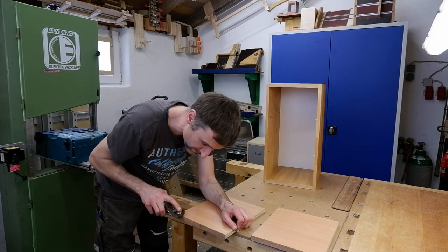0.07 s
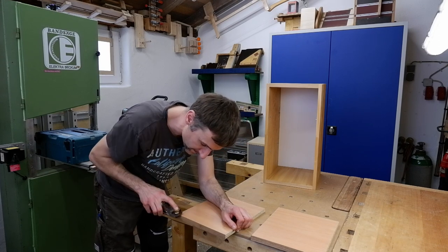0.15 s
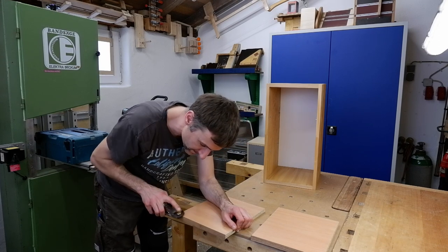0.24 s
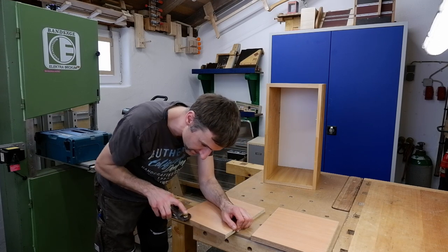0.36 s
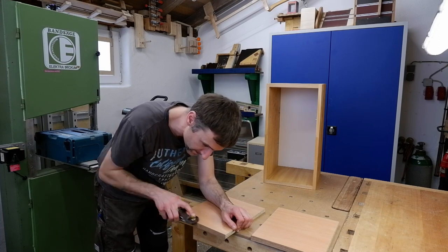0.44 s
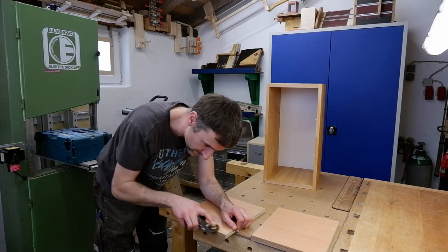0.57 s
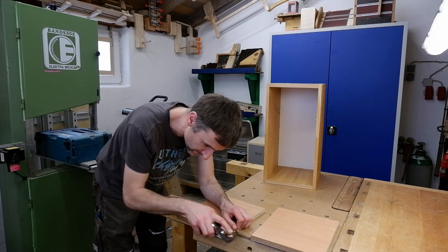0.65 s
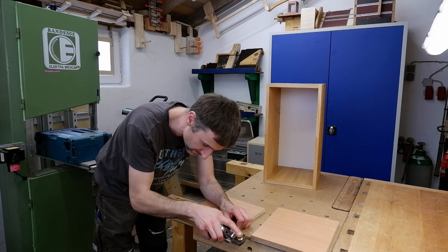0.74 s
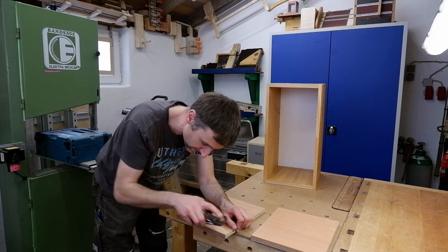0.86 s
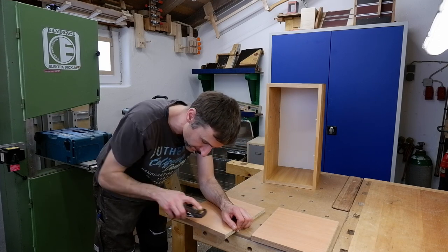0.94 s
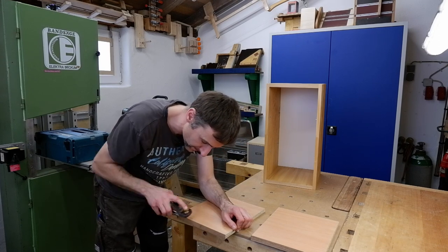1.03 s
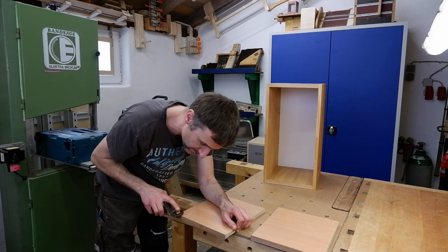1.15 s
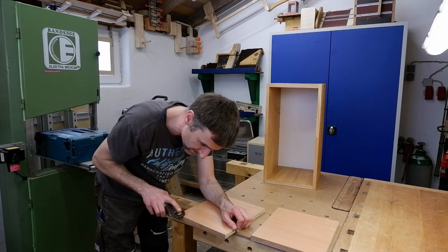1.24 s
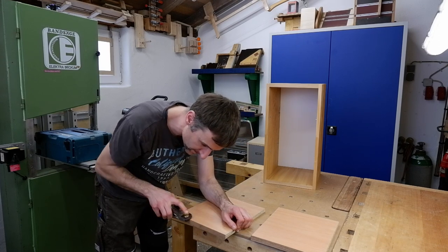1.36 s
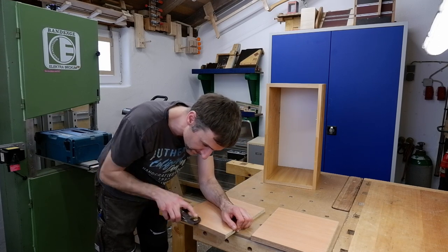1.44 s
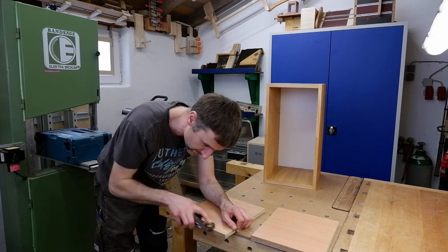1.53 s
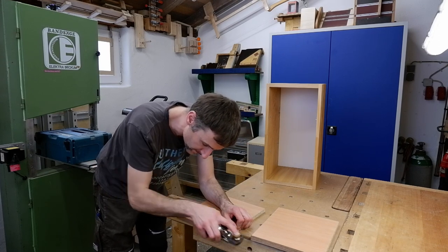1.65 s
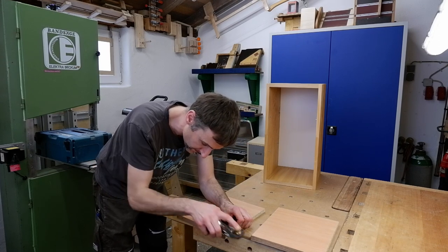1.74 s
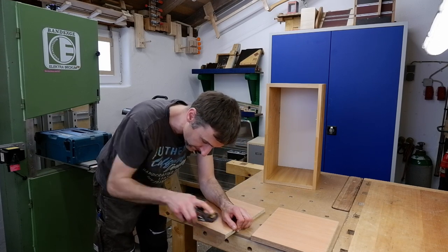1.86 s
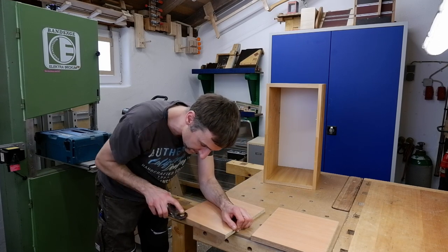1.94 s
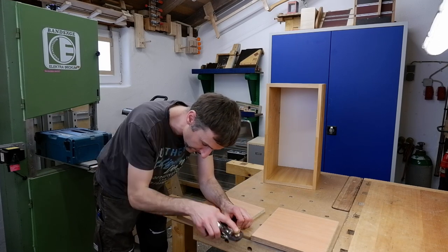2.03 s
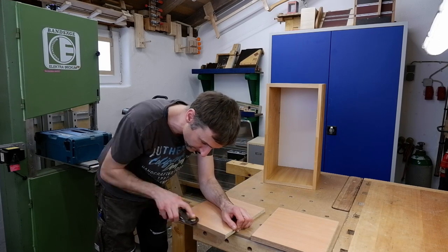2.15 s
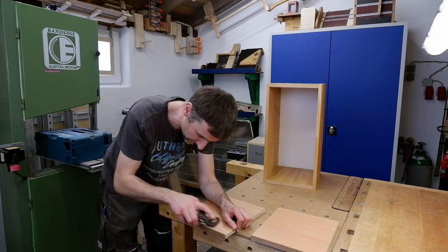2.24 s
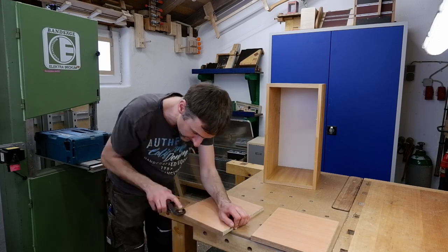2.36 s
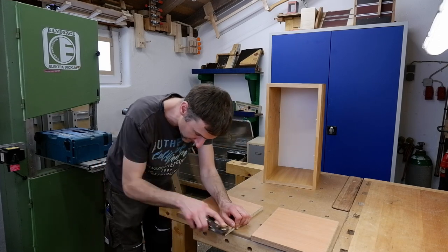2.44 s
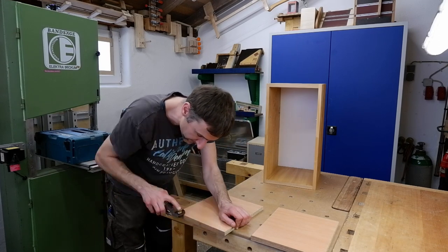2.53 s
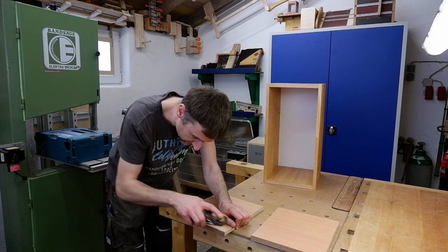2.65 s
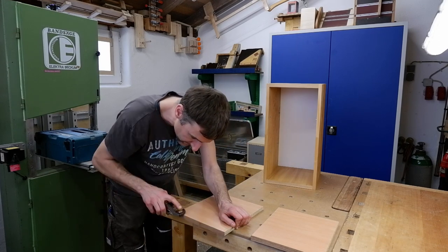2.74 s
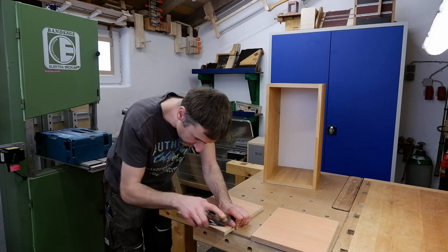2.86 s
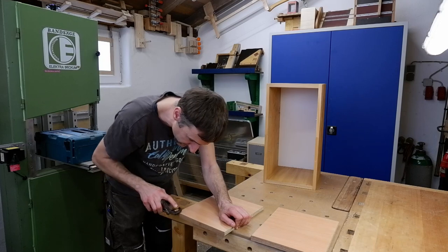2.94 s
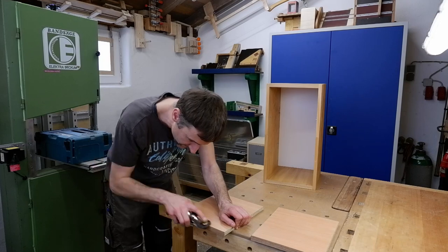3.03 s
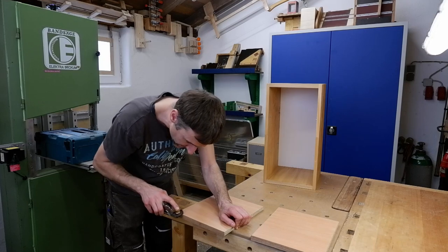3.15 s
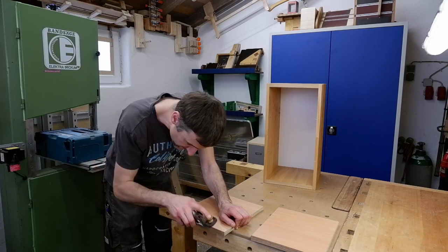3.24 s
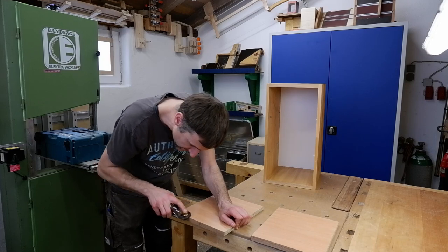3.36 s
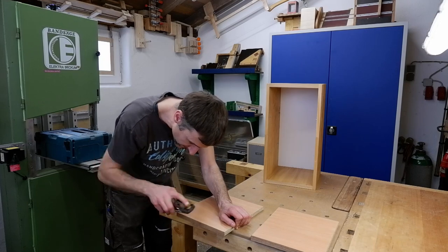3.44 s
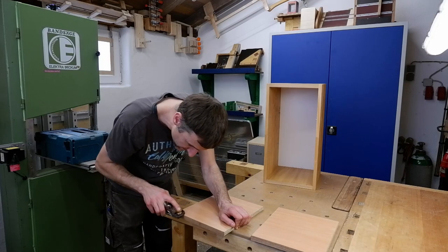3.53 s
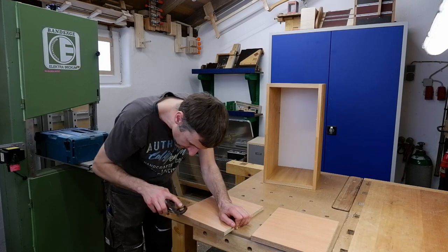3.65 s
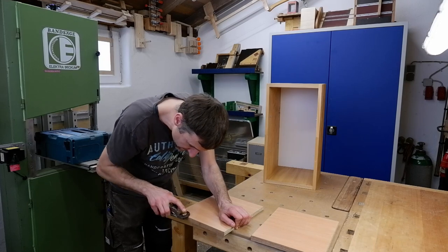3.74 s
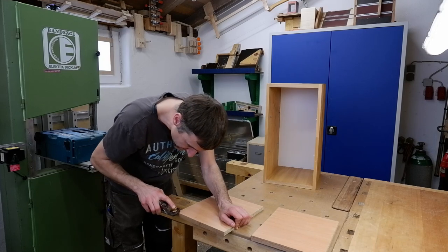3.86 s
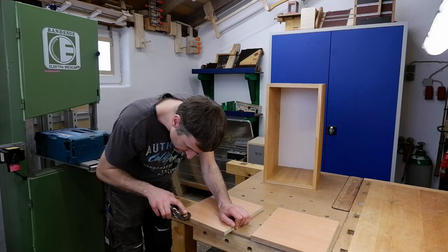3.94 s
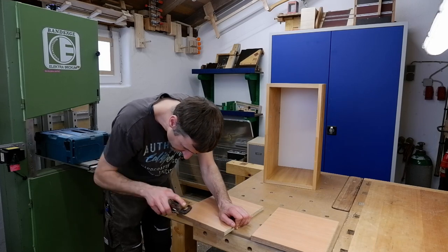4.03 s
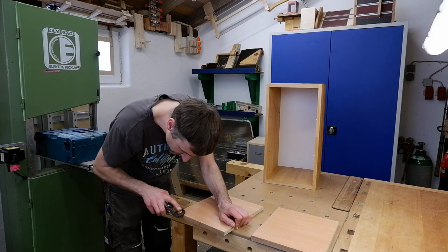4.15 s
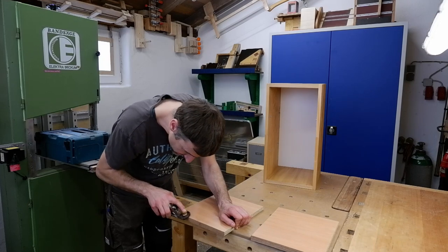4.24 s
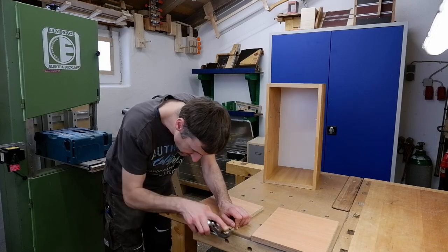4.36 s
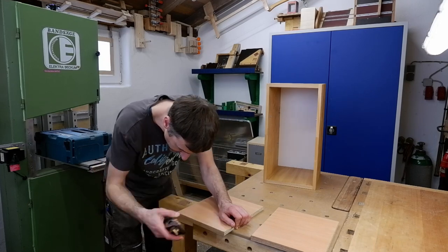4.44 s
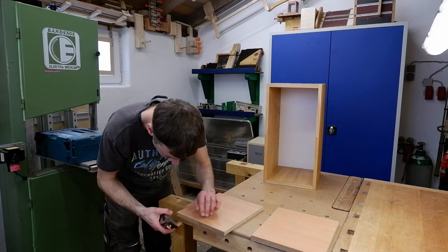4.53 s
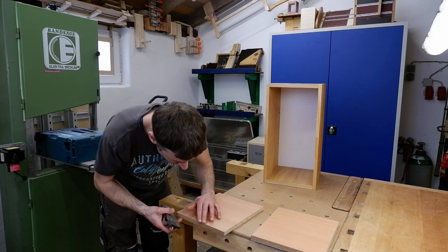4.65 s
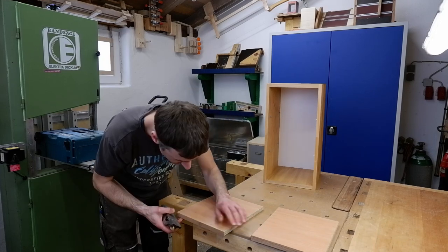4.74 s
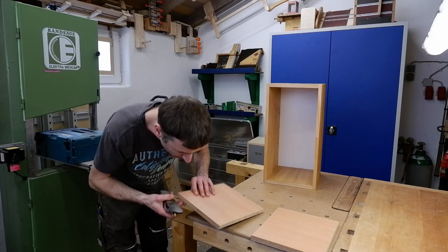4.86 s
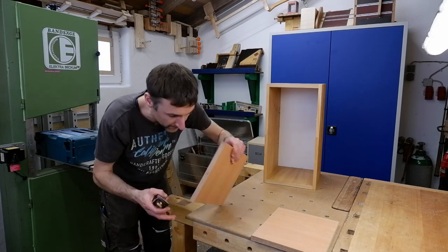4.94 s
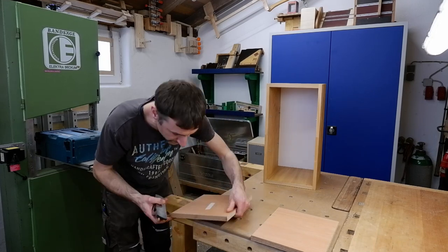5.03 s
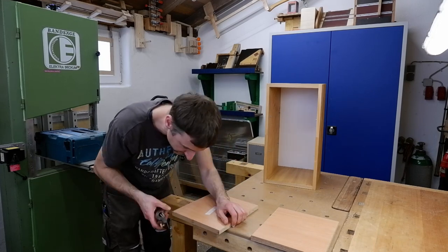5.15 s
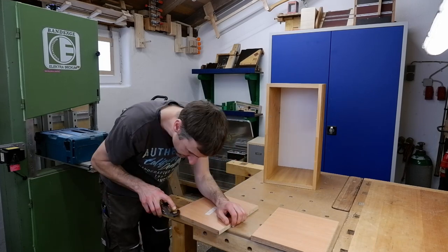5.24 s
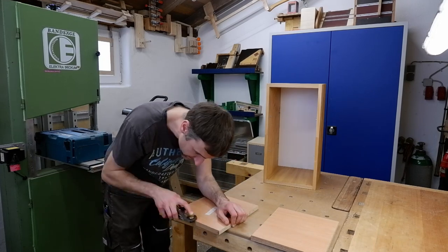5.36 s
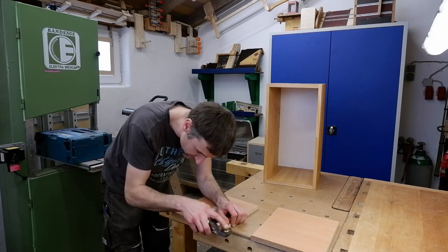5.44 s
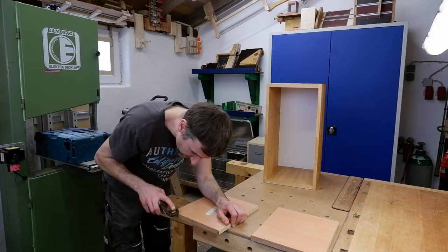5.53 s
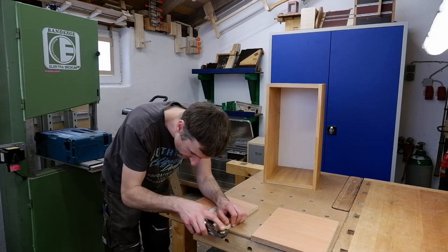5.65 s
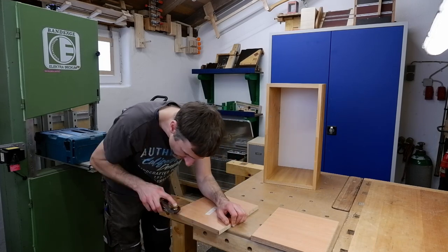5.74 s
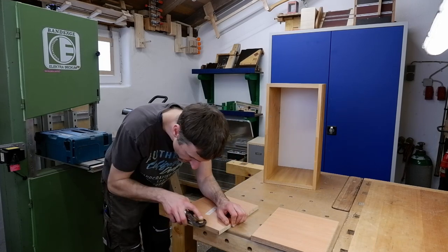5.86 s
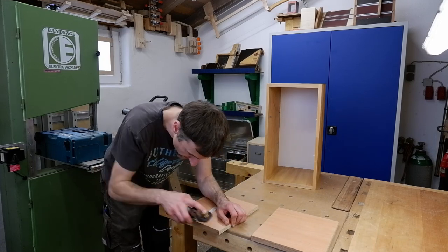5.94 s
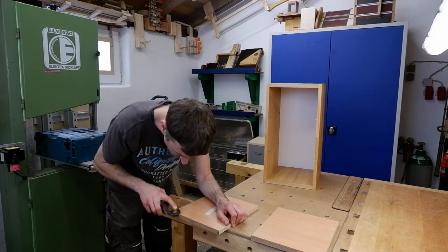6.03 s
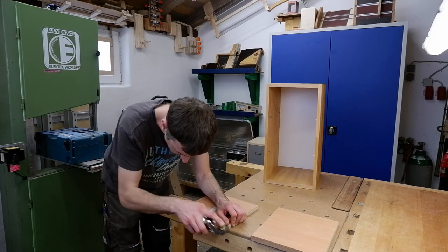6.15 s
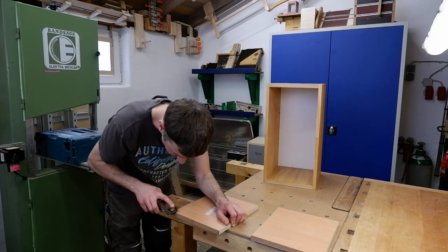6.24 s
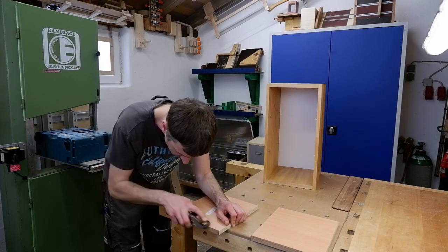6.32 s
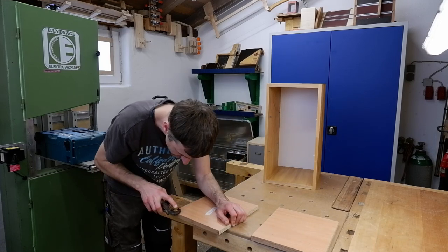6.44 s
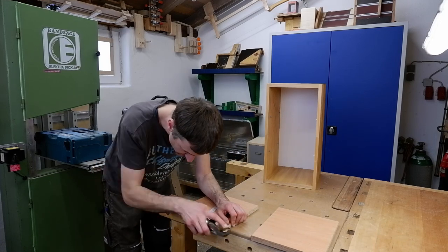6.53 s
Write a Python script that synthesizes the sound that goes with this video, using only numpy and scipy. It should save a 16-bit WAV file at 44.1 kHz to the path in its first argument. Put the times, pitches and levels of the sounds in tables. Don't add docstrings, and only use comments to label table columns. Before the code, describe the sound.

Close view of wood planing on a bench: faint cloth rub, a solid knock with a slight iron rattle, a hoarse growing shave and a clack as the plane leaves, repeated once. Abruptly the work becomes rapid and softer, short zips with blurred taps and hardly any tail. A pause with a crisp rustle, gritty scrape and board set down, then six last short strokes. Quiet room tone throughout.

```python
import sys
import numpy as np
from scipy import signal
from scipy.fft import rfft, irfft
from scipy.io import wavfile
from scipy.ndimage import uniform_filter1d

SR = 44100
rng = np.random.default_rng(int(sys.argv[2]) if len(sys.argv) > 2 else 0)


def persist_wave(psi):
    counts = np.round(np.clip(psi, -1, 1) * 32767).astype(np.int16)
    wavfile.write(sys.argv[1], SR, np.atleast_2d(counts).T)


def how_loud(loudness_db):
    steps = np.asarray(loudness_db, float) / 20
    return 10 ** steps


N = 290619

SPEED_UP_S = 1.915


def rms_one(x):
    return x / np.sqrt(np.mean(x ** 2) + 1e-20)


def at_hz(points, hz):
    pitch_hz, value = np.array(points)[:, 0], np.array(points)[:, 1]
    return np.interp(np.log(hz), np.log(pitch_hz), value)


def envelopes(tables, edge_s, count):
    rows, quiet = [], [-110] * count
    for table in tables:
        first, last = table[0], table[-1]
        rows.append((first[0] - edge_s, *quiet, *first[count + 1:]))
        rows += table
        rows.append((last[0] + edge_s, *quiet, *last[count + 1:]))
    s, *columns = np.transpose(rows)
    return [np.interp(np.arange(N) / SR, s, column) for column in columns]


def drift(rate_hz):
    r = np.exp(-80 * np.pi * rate_hz / SR)
    slow = signal.lfilter([1], [1, -2 * r, r * r], rng.standard_normal(N // 40 + 2002))[2000:]
    return np.interp(np.arange(N) / 40, np.arange(len(slow)), rms_one(slow))


def coloured(spectrum):
    hz = np.arange(N // 2 + 1) * SR / N + 1
    return rms_one(irfft(rfft(rng.standard_normal(N)) * how_loud(at_hz(spectrum, hz)), N))


def band_noise(size, low_hz, high_hz):
    band = signal.butter(2, [low_hz, high_hz], "band", fs=SR, output="sos")
    return signal.sosfilt(band, rng.standard_normal(size))


def fibres(per_s, spread_db):
    sizes = how_loud(spread_db * np.minimum(rng.exponential(1, N), 4))
    sizes = sizes * rng.choice([-1, 1], N)
    return sizes * (rng.random(N) < per_s / SR) + 1e-18


def body(force, modes, wander_db, wander_hz, centre_hz=1000, focus_db=0):
    out, octave = 0, np.log2(centre_hz)
    for k, (hz, width_hz, db) in enumerate(modes):
        r = np.exp(-np.pi * width_hz / SR)
        poles = [1, -2 * r * np.cos(2 * np.pi * hz / SR), r * r]
        rung = signal.lfilter([1, 0, -1], poles, force) * (1 - r * r)
        near_db = -focus_db * np.abs(np.log2(hz) - octave)
        out = out + (-1) ** k * how_loud(db + near_db + wander_db * drift(wander_hz)) * rung
    power = uniform_filter1d(out ** 2, size=1100) + 1e-30
    return rms_one(out / power ** .4)


def add(out, s, sound):
    i = round(s * SR)
    out[i:i + len(sound)] += sound[:N - i]


# pitch_hz, level_db
FLOOR = [(15, -58.5), (45, -27.5), (85, -15.5), (200, -15.5), (382, -20.5), (800, -26.5), (2600, -32.5),
         (15800, -44)]
FLOOR_DB, SPED_FLOOR_DB = -67, -9


def room_floor(sped):
    return how_loud(FLOOR_DB + SPED_FLOOR_DB * sped + 2.0 * drift(12)) * coloured(FLOOR)


# time_s, level_db
SHUFFLE = [
    [(.03, -70), (.2, -78)],
    [(1.0, -97.5), (1.048, -61.5), (1.212, -78), (1.24, -68)],
    [(4.46, -75), (4.464, -74), (4.564, -73), (4.584, -92), (4.89, -91)],
]


def shuffle():
    level_db = envelopes(SHUFFLE, edge_s=0.032, count=1)[0]
    rub = band_noise(N, low_hz=199, high_hz=270) + how_loud(-8) * band_noise(N, low_hz=270, high_hz=520)
    return how_loud(level_db + 2.5 * drift(20)) * rms_one(rub)


# start_s, peak_db, pitch_hz, rattle_delay_s, rattle_db
LANDINGS = [
    (0.2316, -5.5, 658.6, 0.0019, -29.5),
    (1.2559, -6, 736, 0.0091, -34),
]
LAND_RING_DB, LAND_THUD_DB = -22.5, 13
# start_s, peak_db, pitch_hz, ring_db, bench_thud_db
KNOCKS = [
    (0.432, -37.5, 900, -21.5, -12.5),
    (0.7679, -11.5, 950, 3, -14),
    (.77, -19.5, 950, -7.5, -19.5),
    (1.409, -22, 900, -10.5, -19.5),
    (1.7328, -11, 900, 0, -11),
]
# pitch_hz, level_db, t60_s
STRUCK = [(225, -14.5, .07), (274, -19.5, 0.05), (287, -4.5, 0.1), (407, 4.5, 0.065), (454.7, 0.5, 0.015),
          (550, 1.5, 0.12), (570, -6.5, 0.02), (760, -1, 0.011), (930, -2, 0.02), (1130, -11, 0.013),
          (1484, -10.5, 0.085), (2050, -24.5, 0.016)]
# pitch_hz, level_db, t60_s
SPRUNG = [(466, -7.5, 0.027), (666, -4, 0.0099), (950, 4, .014), (1210, -10, 0.011), (1620, -21.5, 0.022)]
# pitch_hz, level_db, t60_s
THUD = [(85.5, -25.5, 0.18), (149, -16.5, 0.11), (171, -17.5, 0.16)]
# delay_s, level_db
ECHOES = [(.006, -11.5), (0.009, -15.5)]


def knocks():
    out, t = np.zeros(N), np.arange(round(.3 * SR)) / SR
    blows = [(-1, STRUCK, s, db, hz, LAND_RING_DB, LAND_THUD_DB) for s, db, hz, _, _ in LANDINGS]
    blows += [(1, SPRUNG, *row) for row in KNOCKS]
    for way, modes, s, db, hz, ring_db, thud_db in blows:
        width = (np.pi * hz * (t - .002)) ** 2
        pulse = way * (1 - 2 * width) * np.exp(-width)
        for lag, echo_db in [(0.00056, 0.01)] + ECHOES:
            add(out, s - .002 + lag, how_loud(db + echo_db) * pulse)
        bench = [(f, d + thud_db, long) for f, d, long in THUD]
        pitch, level, t60 = np.transpose(modes + bench)[:, :, None]
        chance = rng.standard_normal((2, *level.shape))
        rings = how_loud(level + 2.0 * chance[0] - 60 * t / t60) * np.sin(2 * np.pi * pitch * t + np.pi * chance[1])
        add(out, s, how_loud(db + ring_db) * (1 - np.exp(-t / 0.00083)) * rings.sum(axis=0))
    return out


# level_re_peak_db, lowest_hz, highest_hz, t60_s
SHUDDER = [(-11.5, 182, 1300, 0.087), (-28.5, 1500, 1870, 0.35), (-29, 3000, 3800, 0.012),
           (-31, 4000, 4100, 0.01)]
# level_db, lowest_hz, highest_hz, t60_s
RATTLE_BANDS = [(1.6, 4250, 5700, .045), (-6, 6200, 9900, .022)]
# start_s, level_db
BITES = [
    (.372, -46),
    (1.36, -55),
]
# lowest_hz, highest_hz, t60_s
BITE_BAND = (2100, 11800, 0.023)


def clatter():
    out, t = np.zeros(N), np.arange(round(.3 * SR)) / SR
    noises = [(s, db, *BITE_BAND) for s, db in BITES]
    for s, db, _, lag, rattle_db in LANDINGS:
        noises += [(s - .0006, db + d, *band) for d, *band in SHUDDER]
        noises += [(s + lag, rattle_db + d, *band) for d, *band in RATTLE_BANDS]
    for s, db, low_hz, high_hz, t60 in noises:
        add(out, s, how_loud(db - 60 * t / t60) * band_noise(len(t), low_hz, high_hz))
    return out


# pitch_hz, t60_s
ROOM_T60 = [(100, 0.87), (260, .4), (700, 0.29), (2000, 0.33), (5000, 0.22), (12000, 0.14)]
GATE_S, GATE_DB_PER_S = .145, 400


def room(x, speed):
    t, tail = np.arange(round(.5 * SR)) / SR, 0
    for low_hz in 60 * 2.0 ** np.arange(8):
        octave = signal.butter(1, [low_hz, 2 * low_hz], "band", fs=SR, output="sos")
        band = signal.sosfilt(octave, rng.standard_normal(len(t)))
        tail = tail + band * how_loud(-60 * t * speed / at_hz(ROOM_T60, 1.63 * low_hz))
    tail = tail * (t > .004) * how_loud(-GATE_DB_PER_S * np.maximum(t - GATE_S, 0))
    return signal.fftconvolve(x, tail / np.sqrt(np.sum(tail ** 2)))[:N]


# start_s, length_s, peak_db, swell_ratio (re the usual pass), hiss_re_board_db
PASSES = [(0.373, .395, -27, 0.79, -5.5), (1.362, 0.37, -26.5, 0.9, -5), (2.001, 0.077, -37, 1, -5.5),
          (2.19, 0.075, -37, 0.97, -6.5), (2.316, 0.026, -56, .4, -6), (2.424, 0.086, -39.5, 1.18, -9.5),
          (2.616, 0.08, -38.5, 0.84, -7.5), (2.824, 0.071, -37.5, 0.43, -11.5),
          (3.027, .07, -39, 1.54, -14), (3.215, 0.062, -37.5, 1.32, -13), (3.393, 0.065, -37, 1.6, -20.5),
          (3.589, 0.058, -39, 1.03, -13.5), (3.785, 0.046, -41, 0.42, -13.5),
          (3.975, 0.06, -39.5, 1.74, -10), (4.248, .187, -42.5, 0.83, -12),
          (5.349, 0.15, -45.5, 1.28, -11.5), (5.602, 0.11, -43, 1.3, -9.5), (5.845, .12, -41.5, 0.9, -12.5),
          (6.089, 0.11, -40.5, 0.82, -11), (6.323, 0.068, -37.5, 1.07, -8),
          (6.515, 0.069, -39.5, 0.56, -7.5)]
# share_of_way, depth_of_cut_db, speed_db, loudest_board_pitch_hz
ALONG = [(0, -18.5, -7.5, 820), (.2, -11.5, -6.5, 800), (.36, -6.5, -8.5, 1080), (.56, -1, -4, 1150),
         (.7, -1.85, -0.5, 860), (.84, 0.8, -3.9, 830), (1, -0.2, -1.7, 950)]
# time_s, mean_board_pitch_hz
PLACE = [(0, 980), (2.6, 1000), (3.1, 1120), (3.5, 1036), (4.3, 890), (6.6, 950)]
ENTER_S, LEAVE_DB_PER_S, QUICK_LEAVE_DB_PER_S, HISS_LEAVES = .004, 4997, 1312, 1.6
HISS_FOLLOWS = 0.92
THRUM_DB, THRUM_FOLLOWS, SHOVE_DB, SHOVE_SHARE = -19, 0.1, 3, .2
LONG_THRUM_DB = -4.5
IRON_HZ, IRON_OCTAVES_PER_DB = 4500, 0.62
QUICK_SWING, QUICK_SPEED = 0.48, 0.64


def strokes():
    t, out = np.arange(N) / SR, np.full((5, N), -110.0)
    out[3:] = [[IRON_HZ / 5], [IRON_HZ]]
    share, depth_db, speed_db, place_hz = np.transpose(ALONG)
    for s, long, db, swell, hiss_db in PASSES:
        quick = s > SPEED_UP_S
        now = (t > s - ENTER_S) & (t < s + long + .06)
        way = (t[now] - s) / long
        edge = 40 * np.minimum(way * long / ENTER_S, 0)
        leave_db_per_s = QUICK_LEAVE_DB_PER_S if quick else LEAVE_DB_PER_S
        left = leave_db_per_s * long * np.maximum(way - 1, 0)
        depth = swell * np.interp(way, share, depth_db)
        speed = np.interp(way, share, speed_db) * (QUICK_SPEED if quick else 1)
        shove = SHOVE_DB * np.exp(-((way - 1) / SHOVE_SHARE) ** 2) + (0 if quick else LONG_THRUM_DB)
        board = depth - left
        hiss = HISS_FOLLOWS * depth + speed + hiss_db - HISS_LEAVES * left
        thrum = THRUM_DB + THRUM_FOLLOWS * depth + shove - 0.22 * left
        out[:3, now] = np.maximum(out[:3, now], db + edge + np.array([board, hiss, thrum]))
        swing = (np.interp(way, share, place_hz) / PLACE[0][1]) ** (QUICK_SWING if quick else 1)
        out[3, now] = np.interp(s, *np.transpose(PLACE)) * swing
        out[4, now] = IRON_HZ * 2 ** (IRON_OCTAVES_PER_DB * speed)
    return out


# pitch_hz, width_hz, level_db
BOARD = [(420, 96, -5), (637, 86, -4.5), (678, 44, -3), (754, 49, -5.5), (936, 151, -6.5),
         (1067, 134, -6.5), (1168, 86.6, -4.5), (1478, 100, -9.5), (1690, 350, -18)]
# pitch_hz, width_hz, level_db
IRON = [(2050, 620, 2), (3260, 660, 0), (3940, 610, 0.5), (5230, 610, 0), (5900, 700, -5),
        (8400, 1600, -7.5), (10600, 3000, -15), (13000, 6300, -20.5)]
# pitch_hz, width_hz, level_db
BENCH = [(81.5, 64, -15), (162.9, 5.6, 3.5), (320, 84, -7)]
FOCUS_DB, QUICK_FOCUS_DB = 15, 7


def shaving():
    cut_db, hiss_db, thrum_db, centre_hz, iron_hz = strokes()
    judder = how_loud(1.2 * drift(90))
    focus_db = np.where(np.arange(N) > SPEED_UP_S * SR, QUICK_FOCUS_DB, FOCUS_DB)
    board = body(fibres(2500, 2.3), BOARD, wander_db=.9, wander_hz=14, centre_hz=centre_hz, focus_db=focus_db)
    iron = body(fibres(5000, 2.2), IRON, wander_db=3.0, wander_hz=25, centre_hz=iron_hz, focus_db=1.0)
    iron = iron * how_loud(1.3 * drift(70))
    bench = body(fibres(1500, 0.93), BENCH, wander_db=-0.2, wander_hz=2.5)
    cut, thrum = uniform_filter1d(how_loud([cut_db, thrum_db]), size=400)
    return judder * (cut * board + how_loud(hiss_db) * iron) + thrum * bench * how_loud(3.0 * drift(24))


SPLICE_S, SPLICE_FADE_S = 0.025, 0.011
BLOW_TILT_DB = 1


def smeared(modes, crack_db, thud_db, rise_s, fall_s):
    t = np.arange(-round(.04 * SR), round(.12 * SR)) / SR
    swell = np.exp(-np.where(t < 0, -t / max(rise_s, .001), t / max(fall_s, .002)) ** 0.82)
    swell = swell * np.clip((t + SPLICE_S) / SPLICE_FADE_S, 0, 1) ** 2
    hz = np.arange(len(t) // 2 + 1) * SR / len(t)
    chance = rng.standard_normal((2, len(modes)))
    pitch_hz, mode_db = np.array(modes)[:, 0], np.array(modes)[:, 1]
    levels = mode_db + 2 * chance[0] + BLOW_TILT_DB * np.log2(pitch_hz / 600)
    colour = sum(how_loud(db) / (1 + ((hz - f) / (0.085 * f)) ** 2) for f, db in zip(pitch_hz, levels))
    colour = colour + how_loud(crack_db) / (1 + (hz / 2600) ** 3.24) * np.minimum(hz / 1200, 1)
    pulse = np.roll(irfft(colour, len(t)), round(.04 * SR)) * rng.choice([-1, 1])
    noise = rms_one(irfft(colour * rfft(rng.standard_normal(len(t))), len(t)))
    ring = swell * (0.71 * pulse / np.abs(pulse).max() + .45 * noise)
    hum = np.cos(2 * np.pi * BENCH[1][0] * t + np.pi * chance[1, 0])
    thud = how_loud(thud_db - 6.5) * swell ** 1.33 * hum
    return ring / np.abs(ring).max() + thud


# peak_time_s, peak_db, crack_re_peak_db, bench_thud_db, fall_s
BUMPS = [(1.9771, -36.5, -30, 2.1, 0.0058), (2.1729, -46, -38, 3, 0.0083), (2.4037, -45, -33, 1, 0.015),
         (2.5884, -32, -32, 1.5, 0.0049), (2.8033, -20.5, -12.5, -10, 0.0038),
         (2.9958, -24.5, -36, -6.5, 0.003), (3.1933, -37, -21, -2.5, 0.0064),
         (3.385, -36.5, -11, -3.5, 0.011), (3.5666, -33, -13.5, -1.5, .007),
         (3.7613, -39.5, -24, -0.5, 0.0071), (3.9434, -30.5, -49.5, -7, 0.0027),
         (4.1726, -53, -33, 11, 0.0053), (4.2261, -47.5, -38, -11, 0.01), (5.31, -40, -19, 7, 0.0072),
         (5.5825, -41, -20, 1, .008), (5.8207, -23, -26, -4.5, 0.003), (6.0744, -32.5, -12.5, -1.7, .0059),
         (6.3061, -39, -42, 4, 0.0062), (6.4983, -39.5, -20, 4, 0.0063)]
# peak_time_s, peak_db, crack_re_peak_db, bench_thud_db, fall_s
EXITS = [(3.075, -32, -21, -17, 0.0053), (3.2616, -31, -27, -13, 0.003), (4.42, -23, -33, -12, 0.0042)]
# peak_time_s, peak_db, crack_re_peak_db, bench_thud_db, fall_s
LAID = [
    (5.0985, -36.5, -40, 9, .009),
    (5.1838, -18, -19, -15, .0065),
]
# pitch_hz, level_db, t60_s
FREE = [(282, -2, .05), (471, 1, .05), (685, 4, .05), (950, -19.5, .05), (1120, 0, .05), (1666, -4, .05),
        (1660, -7, .05), (2430, -21, .05)]
RISE_SHARE, LAID_RISE_SHARE = .9, 0.31


def bumps():
    out = np.zeros(N)
    cut = [(hz, db, width_hz) for hz, width_hz, db in BOARD[2:]]
    kinds = ((BUMPS, STRUCK, RISE_SHARE), (EXITS, cut, RISE_SHARE), (LAID, FREE, LAID_RISE_SHARE))
    for table, modes, rise in kinds:
        for s, db, crack_db, thud_db, fall_s in table:
            blow = smeared(modes, crack_db, thud_db, rise * fall_s, fall_s)
            add(out, s - .04, how_loud(db) * blow)
    return out


# time_s, level_db
RUSTLE = [(4.64, -86), (4.67, -73), (4.782, -68.5), (4.804, -102), (4.826, -62), (4.84, -86), (4.9, -68.5)]
# pitch_hz, level_per_hz_db
HISS = [(2000, -12), (4000, -9), (8000, -2.5), (12000, -7.5), (15500, 2.5)]


def rustling():
    level_db = envelopes([RUSTLE], edge_s=0.0067, count=1)[0]
    return how_loud(level_db + 3.3 * drift(30)) * coloured(HISS)


# time_s, level_db, crackle_re_level_db
WIPE = [
    [(4.895, -88, -12), (4.905, -53.5, -20), (4.947, -39.5, -6), (4.959, -48, -11.5), (4.983, -36.5, -14.5),
     (5.04, -95, -7.5)],
    [(5.105, -60, -30), (5.115, -66, -20), (5.165, -60, -21), (5.175, -45, -19)],
]
# pitch_hz, width_hz, level_db
SWIPED = [(164.8, 76, -5.5), (643, 260, -1.5), (1460, 78, 1), (1740, 43, 1.5), (2360, 230, -13)]
# pitch_hz, width_hz, level_db
CRACKLE = [(2930, 360, -3), (3550, 470, 0), (4200, 230, 4), (5050, 200, -3.5), (6220, 670, -16.5),
           (8200, 970, -12), (13000, 1100, -26)]


def swiping():
    swipe_db, crackle_db = envelopes(WIPE, edge_s=.008, count=1)
    grains = fibres(2200, 3.3) * how_loud(2.5 * drift(80))
    scrape = body(grains, SWIPED, wander_db=2.5, wander_hz=56)
    scrape += how_loud(crackle_db) * body(grains, CRACKLE, wander_db=3.5, wander_hz=48)
    return how_loud(swipe_db) * scrape


def scene():
    sped = np.clip((np.arange(N) / SR - SPEED_UP_S) / 0.015, 0, 1)
    cut = shaving()
    slow = cut * (1 - sped) + knocks() + clatter()
    fast = cut * sped + bumps() + rustling() + swiping()
    slow = (slow + how_loud(-11.5) * room(slow, speed=0.97)) * (1 - sped)
    fast = fast + how_loud(-16.5) * room(fast, speed=7.4)
    return (slow + fast + shuffle() + room_floor(sped))[None]


def top_cut(x):
    return signal.sosfilt(signal.butter(12, 16120, fs=SR, output="sos"), x)


MIC_LOW_HZ, CUTOFF_HZ = 69.6, 16100


def record(dry):
    thin = signal.sosfilt(signal.butter(2, MIC_LOW_HZ, "high", fs=SR, output="sos"), dry)
    mix = signal.sosfilt(signal.cheby2(14, 60, CUTOFF_HZ, fs=SR, output="sos"), thin)
    return top_cut(mix)


dry = scene()
out = record(dry)
persist_wave(out)
```